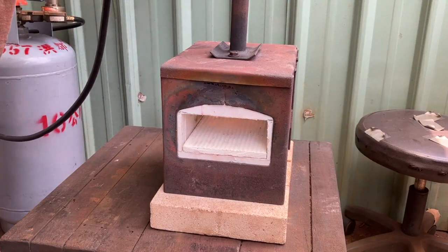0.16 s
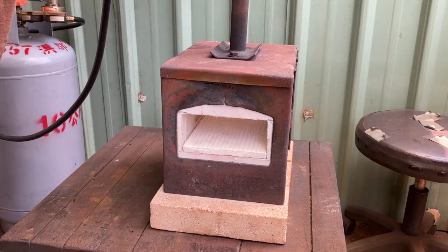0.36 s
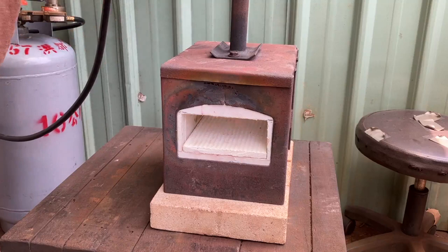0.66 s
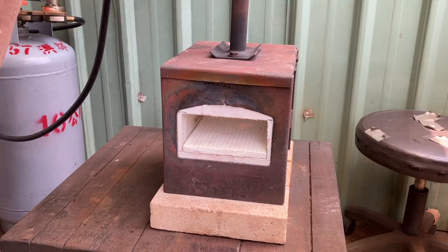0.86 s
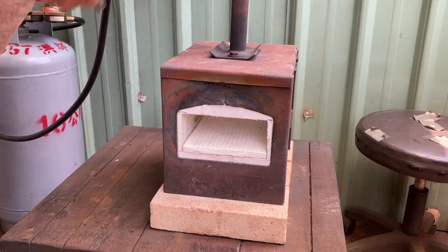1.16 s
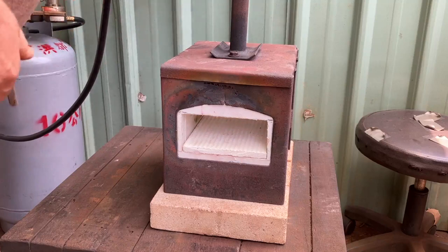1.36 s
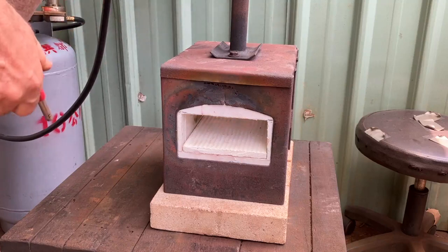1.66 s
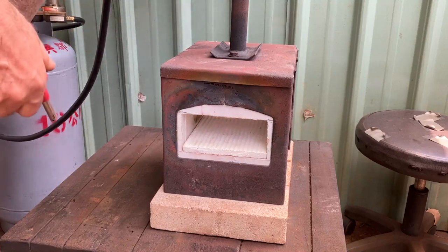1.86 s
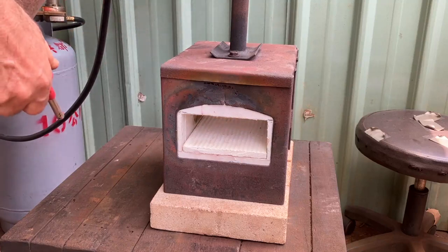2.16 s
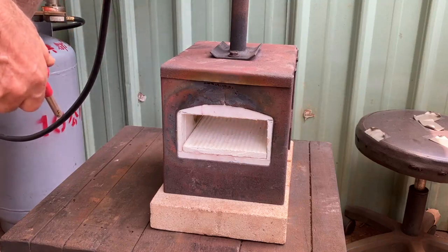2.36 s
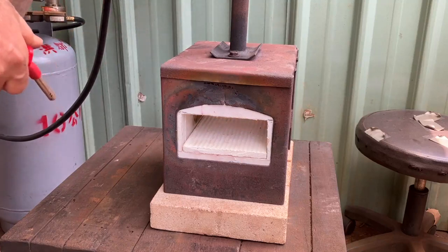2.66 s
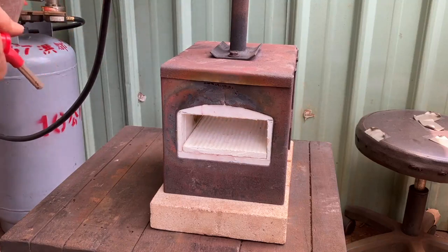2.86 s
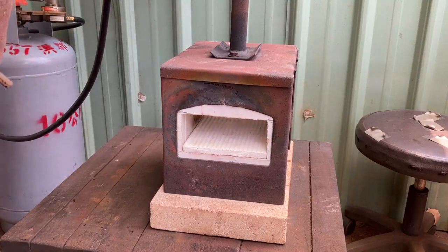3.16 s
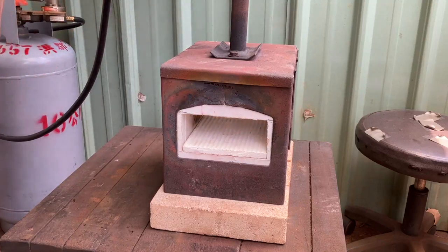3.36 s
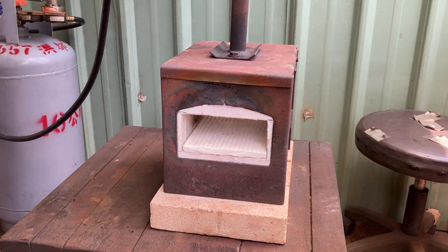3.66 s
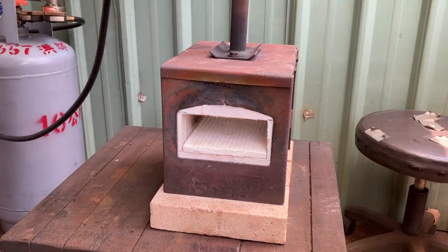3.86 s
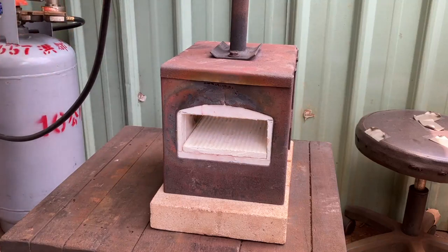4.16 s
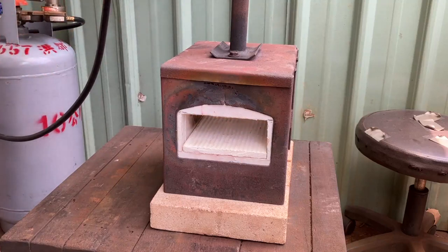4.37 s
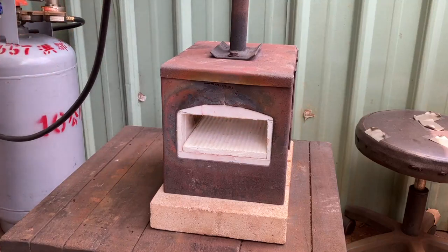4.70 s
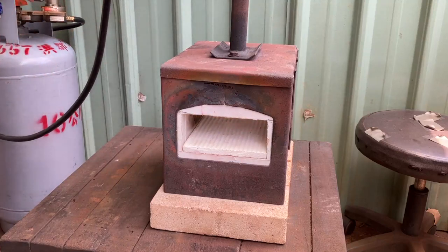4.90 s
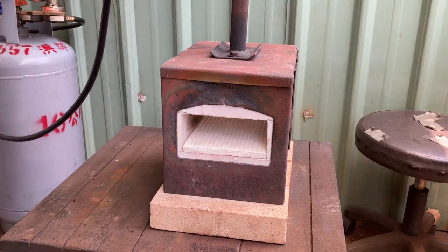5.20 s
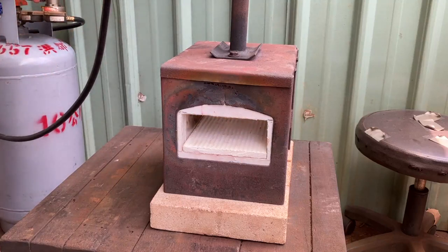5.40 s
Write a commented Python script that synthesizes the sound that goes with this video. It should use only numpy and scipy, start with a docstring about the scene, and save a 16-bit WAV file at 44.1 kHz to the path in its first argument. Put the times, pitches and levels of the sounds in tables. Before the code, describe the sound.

A hard ignition pop with a low whump, then a rapid, stuttering series of hollow hoots, about forty a second, over heavy bass rumble and rough hiss. Near 1.7 seconds the hooting stops and a smooth breathy roar with a wavering boom runs to the end. Nearby stereo pickup, thin in the deepest bass, with a brief sheet-metal shed echo.

```python
"""A thump as a gas forge burner catches, heard from two microphone ports a little apart in a sheet-metal shed.
The flame flutters in the burner pipe first: gliding tones hoot in quick puffs over a heavy noise rumble.
Then it jumps into the firebox: noise shaped by the box modes and a wavering boom make a steady roar.
Hissing noise of flame and jet lies behind; wall resonances and sparse reflections place it all in the shed."""
import sys
import numpy as np
from scipy import signal
from scipy.fft import rfft, irfft
from scipy.io import wavfile
from scipy.ndimage import uniform_filter1d

SR = 44100
rng = np.random.default_rng(int(sys.argv[2]) if len(sys.argv) > 2 else 0)


def waveform_to_disk(signal):
    """Save audio, clipped to [-1, 1], as 16-bit WAV at the path in sys.argv[1]."""
    frames = np.transpose(np.atleast_2d(signal))
    scaled = np.clip(frames, -1, 1) * 32767
    samples = np.round(scaled).astype(np.int16)
    wavfile.write(sys.argv[1], SR, samples)


N = 244314
T = np.arange(N) / SR
HZ = np.fft.rfftfreq(N, 1 / SR)
CATCH_S = 0.0373  # the gas catches
SETTLED = np.clip((T - 1.68) / 0.027, 0, 1)  # 0 while the flame is in the pipe, 1 in the firebox

# modes of the firebox: (frequency [Hz], width [Hz], height above the slope [dB])
FIREBOX = [(191.4, 32, 8.5), (309, 53, 5.5), (396, 29, 0.5), (1010, 24, 3), (1122, 80, 10.5)]
# slope of the roar: (frequency [Hz], relative density [dB per Hz])
ROAR = [(90, -6.5), (125, -7.5), (200, -1), (400, -5), (500, -18), (700, -14), (1000, -26.5), (1500, -30),
        (2500, -52), (5000, -49)]
# colour of the flame hiss: (frequency [Hz], relative density [dB per Hz])
HISS = [(600, 9), (1500, -1), (2500, 2.5), (3000, 1.5), (3700, -4), (4500, -3.5), (5200, -6.5), (6200, -17),
        (8000, -6), (12000, -91)]
# colour of the gas jet: (frequency [Hz], relative density [dB per Hz])
JET = [(3000, -39), (5500, -0.5), (7200, 1), (9000, -13.5), (11000, 4), (13500, -13), (16000, 1.5)]


def gain_of(db):
    """Decibels to gain."""
    return 10 ** (np.asarray(db) / 20)


def evened(x):
    """Scales to rms 1."""
    return x / np.sqrt(np.mean(x ** 2) + 1e-20)


def read(points, hz):
    """Reads a table on a log-frequency axis."""
    f, value = np.transpose(points)
    return np.interp(np.log(hz + 1), np.log(f + 1), value)


def columns(rows):
    """Turns the columns of a timed table into control curves, sample by sample."""
    s, *cols = np.transpose(rows)
    return [np.interp(T, s, c) for c in cols]


def bumps(modes):
    """Sum of bell-shaped peaks in dB; each has half its dB at the edges of its width."""
    return sum(db / (1 + (2 * (HZ - hz) / width) ** 2) for hz, width, db in modes)


def band(hz, width_hz):
    """Shape in dB of a steep resonance, 6 dB down at the edges of its width."""
    return -20 * np.log10(1 + (2 * (HZ - hz) / width_hz) ** 2)


def coloured(shape_db):
    """Two unrelated noises of one colour, at rms 1."""
    a, b = rng.standard_normal((2, 2, len(HZ)))
    return evened(irfft((a + 1j * b) * gain_of(shape_db), N))


def flicker(lo_hz, hi_hz, depth_db):
    """Random loudness of turbulent burning, power kept at 1."""
    spectrum = rfft(rng.standard_normal(N)) * (HZ > lo_hz)
    slow = evened(irfft(spectrum / np.sqrt((HZ + 1) * (1 + (HZ / hi_hz) ** 4)), N))
    return evened(gain_of(depth_db * slow))


def steadied(x, share):
    """Evens out the swells of a low noise, so that it throbs like an oscillation."""
    swell = np.sqrt(uniform_filter1d(x ** 2, round(0.054 * SR)))
    return evened(x / (swell + 0.063) ** share)


def patchy(x, depth_db):
    """Eddies colour a noise in patches that drift in time and pitch."""
    z = signal.stft(x, nperseg=1024)[2]
    patches = uniform_filter1d(rng.standard_normal(z.shape[1:]), size=5, axis=0)
    patches = uniform_filter1d(patches, size=12, axis=1)
    return evened(signal.istft(z * gain_of(depth_db * evened(patches)), nperseg=1024)[1][:, :N])


def resonate(x, hz, width_hz):
    """A resonance of gain 1 at its peak."""
    return signal.lfilter(*signal.iirpeak(hz, hz / width_hz, SR), x)


def add(mix, s, sound):
    """Mixes a sound in at a time."""
    part = mix[..., round(s * SR):][..., :sound.shape[-1]]
    part += sound[..., :part.shape[-1]]


def random_phases(count):
    """One random phase per event and row."""
    return rng.uniform(0, 2 * np.pi, (count, 2, 1))


def burst(db, hz, length, glide, phase, rise=0.28):
    """A short rounded tone that glides to its pitch and peaks at the share rise of its length."""
    length = max(length, .003)
    u = np.arange(round(length * SR)) / (length * SR)
    shape = np.sin(np.pi * u ** (np.log(.5) / np.log(rise))) ** 2
    pitch = hz * (1 - glide * np.exp(-u / 0.16))
    return gain_of(db) * shape * np.sin(2 * np.pi * np.cumsum(pitch) / SR + phase)


def firebox_roar(roar_db, shake):
    """Broad combustion noise through the firebox modes; once settled, a boom and a body join it."""
    # uneven random swells of the steady roar, the boom's pitch wavering slightly:
    # (time [s], boom level [dB], body level [dB], boom pitch [Hz])
    roar_swells = [(1.68, -47, -44, 194.7), (1.72, -27.5, -41, 194), (1.81, -24, -26, 181.5),
                   (1.87, -34, -38, 180), (1.93, -29, -25.5, 183.6), (1.99, -43, -37, 190),
                   (2.01, -36, -53, 194.5), (2.04, -42, -25, 200.7), (2.12, -22, -30, 185.9),
                   (2.14, -42, -38, 187.7), (2.17, -17.5, -32.5, 186.7), (2.27, -37, -25.5, 187.3),
                   (2.31, -24, -31, 190.2), (2.33, -30.5, -31, 192.7), (2.51, -20.5, -31.5, 190.8),
                   (2.56, -47, -38, 179.5), (2.6, -24, -29, 179.1), (2.71, -46, -31.5, 184.6),
                   (2.73, -22.5, -31.5, 182.4), (2.85, -26, -29, 205.7), (2.93, -29.5, -31, 185),
                   (3.14, -31, -27.5, 194.5), (3.22, -29, -24, 182), (3.3, -19.5, -30.5, 184.6),
                   (3.33, -30, -46, 182), (3.37, -23, -26, 180.8), (3.43, -26, -26.5, 186.9),
                   (3.46, -22, -45, 190.3), (3.5, -28, -21, 190.3), (3.53, -31, -31.5, 203.8),
                   (3.7, -25, -30, 189.7), (3.72, -51, -63, 192.7), (3.74, -19, -31, 192.1),
                   (3.78, -31, -28.5, 184.3), (3.95, -29.5, -30.5, 199), (3.98, -29.5, -33, 182.5),
                   (4.14, -26.5, -55, 192.2), (4.16, -43, -28, 198.6), (4.26, -20.5, -42, 210.7),
                   (4.32, -43, -28.5, 200.1), (4.36, -29, -29, 188.5), (4.44, -22, -27, 182.5),
                   (4.51, -30, -27.5, 205.1), (4.61, -28.5, -47, 196.5), (4.64, -40, -30, 196.2),
                   (4.68, -21.5, -30.5, 195.3), (4.78, -32, -28, 196.7), (4.81, -25, -55, 197.6),
                   (4.83, -28.5, -27.5, 191.5), (5.02, -26, -40, 185.3), (5.16, -24, -34, 188.6),
                   (5.18, -36, -46, 192.4), (5.24, -31, -28, 202.8), (5.29, -19.5, -29, 199.7),
                   (5.33, -29, -31.5, 184.2), (5.54, -25.5, -35, 178.7)]
    # colour of the body: (frequency [Hz], relative density [dB per Hz])
    body_colour = [(180, -19), (240, 3), (300, 12.5), (340, 7.5), (400, 7.5), (440, -38), (560, -53)]
    early = coloured(read(ROAR, HZ) + bumps(FIREBOX))
    around = FIREBOX[3:] + [(287, 110, -0.9)]  # what lies around the boom and body
    late = gain_of(-6) * coloured(read(ROAR, HZ) + bumps(around))
    roar = gain_of(roar_db) * ((1 - SETTLED) * early + SETTLED * late)
    boom_db, body_db, boom_hz = columns(roar_swells)
    roar += SETTLED * gain_of(boom_db) * boom(boom_hz, share=0.5)
    roar += SETTLED * gain_of(body_db) * steadied(coloured(read(body_colour, HZ)), share=0.55)
    roar += firebox_tones()
    return roar * shake * flicker(lo_hz=9.3, hi_hz=88, depth_db=0.5)


def boom(hz, share):
    """The lowest firebox tone: a narrow noise band around a slightly wavering pitch."""
    width_hz = 40
    z = coloured(band(0, width_hz)) + 1j * coloured(band(0, width_hz))
    z = z / (abs(z[:1]) + 0.9) ** share  # its swells are partly evened out
    return evened((z * np.exp(2j * np.pi * np.cumsum(hz) / SR)).real)


def firebox_tones():
    """Three narrow noise bands that trade strength as the flame changes length."""
    # strength of the tones: (time [s], low level [dB], middle level [dB], high level [dB])
    tone_levels = [(0.0, -54, -66, -69), (0.04, -29, -51, -29), (0.17, -45, -44, -38.5),
                   (0.57, -41.5, -38, -37), (1.02, -31, -45, -35.5), (1.29, -36.5, -46, -33),
                   (1.4, -34.5, -30.5, -33), (1.57, -33.5, -55, -38.5), (1.64, -36, -47, -34),
                   (1.68, -44, -61, -48), (1.73, -28, -54, -38.5), (1.95, -31.5, -45, -38.5),
                   (2.5, -31.5, -56, -38.5), (2.95, -33, -50, -38.5), (3.39, -31, -41, -41.5),
                   (3.75, -32, -40, -37), (4.12, -43.5, -39.5, -40), (4.7, -42, -40.5, -37.5),
                   (5.38, -70, -36, -40), (5.54, -54, -31.5, -32.5)]
    # place of the tones, low to high: (frequency [Hz], width [Hz])
    tone_modes = [(470, 134), (615, 104), (800, 110)]
    tones = np.zeros((2, N))
    for db, (hz, width) in zip(columns(tone_levels), tone_modes):
        tones += (T > CATCH_S) * gain_of(db) * coloured(band(hz, width))
    return tones


def hoot(db, hz, length, glide, phase):
    """One puff: a rounded tone whose pitch slides and levels off, with a faint third harmonic."""
    tail = 1.69  # a puff takes this much longer to fall than to rise
    t = np.arange(-length / 2, tail * length / 2, 1 / SR)
    pitch = hz + 500 * glide * length * np.tanh(2 * t / length)
    angle = 2 * np.pi * np.cumsum(pitch) / SR + phase
    shape = abs(np.cos(np.pi * t / length / np.where(t > 0, tail, 1))) ** 1.12
    return gain_of(db) * shape * (np.sin(angle) + gain_of(-37.5) * np.sin(3 * angle))


def puffs():
    """The hoots of the puffs, and the strength curves by which they drive howl, hiss and roar."""
    # each puff of flame in the pipe: (time of its top [s], peak level [dB], pitch at its top [Hz],
    # twice its rise time [s], slide at its top [Hz per ms], spit of hiss [dB], thud [dB])
    puff_rows = [(0.081, -23.5, 990, 0.016, 17, -46.5, -20), (0.109, -31, 936, 0.0132, 16, -52, -23),
                 (0.134, -16.5, 1008, 0.016, 14, -43, -39), (0.161, -19.5, 1053, 0.0203, 4.5, -68, -42),
                 (0.1907, -20.5, 1106, 0.014, 11, -42, -24.5), (0.222, -26.5, 990, 0.019, 10, -53, -32),
                 (0.243, -23, 1010, 0.011, 0, -52, -25), (0.268, -20.5, 920, 0.013, 6, -74, -36),
                 (0.293, -22.5, 895, 0.0095, 22, -61, -31), (0.328, -23, 1117, 0.022, 7, -39.5, -29),
                 (0.347, -29, 920, 0.0097, -4, -58, -37), (0.376, -17, 1037, 0.0108, 16, -48, -23),
                 (0.404, -20, 1036, 0.016, 14, -47, -21.5), (0.4235, -24, 886, 0.012, 6, -58, -27),
                 (0.448, -22, 1048, 0.014, 12, -52, -24), (0.4737, -19, 1050, 0.016, 10, -38.5, -19.5),
                 (0.497, -19, 873, 0.0099, 18, -73, -40), (0.517, -18, 947, 0.012, 22.3, -71, -26),
                 (0.5416, -17.5, 1007, 0.0097, 31, -41, -26), (0.569, -23, 954, 0.0123, 34, -54, -27),
                 (0.5933, -28.5, 1117, 0.016, 6, -53, -26), (0.6194, -22, 970, 0.016, -4, -65, -36),
                 (0.6445, -24.5, 960, 0.01, -6, -38.5, -18.5), (0.692, -27, 1020, 0.0093, 31, -47, -22.5),
                 (0.709, -34.5, 966, 0.025, 12, -52, -28.5), (0.737, -38, 1130, 0.015, 24, -55, -22),
                 (0.758, -30, 940, 0.0098, -10, -66, -24), (0.7834, -33, 1060, 0.014, 3, -70, -32),
                 (0.803, -25.5, 914, 0.028, 3, -48, -26), (0.828, -27, 914, 0.01, 21, -50, -25.5),
                 (0.8577, -16.5, 1153, 0.012, 6, -39.5, -19.5), (0.884, -29, 980, 0.0103, 6, -56, -21.5),
                 (0.925, -16.5, 1005, 0.0107, 18, -62, -31), (0.948, -16, 940, 0.018, -5, -66, -42),
                 (0.97, -12.5, 1170, 0.011, 5.8, -40.5, -19), (0.999, -24, 995, 0.0094, -1, -62, -37),
                 (1.0264, -24.5, 1110, 0.023, 5, -46, -18.5), (1.051, -31, 1040, 0.0106, 17, -53, -29),
                 (1.103, -22, 1098, 0.023, 8.5, -43, -20.5), (1.128, -17.5, 1067, 0.022, 11, -45, -27),
                 (1.153, -20, 1068, 0.012, 18, -43, -23), (1.176, -21, 996, 0.0113, 20, -52, -22.5),
                 (1.208, -30, 1020, 0.0097, -13, -51, -22.5), (1.227, -28, 1063, 0.016, 6, -48, -20.5),
                 (1.2504, -22, 1060, 0.011, 9, -49, -41), (1.27, -21, 987, 0.0109, 27, -55, -24),
                 (1.295, -22.5, 966, 0.019, 4, -62, -30), (1.317, -18, 960, 0.0121, 6, -48, -21),
                 (1.34, -23, 854, 0.0105, -23, -58, -28), (1.364, -26, 1070, 0.012, 15, -63, -39),
                 (1.384, -17, 848, 0.0119, 18, -60, -38), (1.407, -17, 934, 0.0122, 52, -49, -21),
                 (1.424, -36, 1114, 0.0216, 1, -47, -23), (1.444, -25, 1142, 0.01, 6, -46, -37),
                 (1.4706, -26, 1070, 0.011, 1, -59, -18), (1.493, -35, 1090, 0.015, -8, -65, -24),
                 (1.5154, -25.5, 920, 0.0116, 40, -41, -26), (1.5273, -33, 1025, 0.013, -23, -71, -37),
                 (1.549, -30, 986, 0.022, 2, -47, -29), (1.592, -31.5, 1000, 0.012, 9, -43, -24),
                 (1.6265, -22.5, 862, 0.0138, 29, -52, -39), (1.649, -26.5, 966, 0.01, -4, -59, -27.5)]
    usual_db, throb_share = -19, 0.21  # share of a puff's extra strength in dB that passes to the throb
    lead_s = 0.0053  # throb, spit and thud start this long before the top of a puff
    spit_rise_s, spit_fall_s, linger_s, linger_db = 0.0065, 0.0086, 0.024, -5.5
    whump_s = 0.007  # rise of the thud that a puff gives the roar
    u = np.arange(round(.08 * SR)) / SR
    throb_shape = u / 0.0047 * np.exp(1 - u / 0.0052)
    afterglow = gain_of(linger_db) * np.exp(-u / linger_s)
    spit_shape = (1 - np.exp(-u / spit_rise_s)) * (np.exp(-u / spit_fall_s) + afterglow)
    whump_shape = u / whump_s * np.exp(1 - u / whump_s)
    hoots, throb, spit, whump = np.zeros((2, N)), np.zeros(N), np.zeros(N), np.zeros(N)
    for row, phase in zip(puff_rows, random_phases(len(puff_rows))):
        top, db, hz, length, glide, spit_db, thud_db = row
        add(hoots, top - length / 2, hoot(db, hz, length, glide, phase))
        s = top - lead_s
        add(throb, s, gain_of(throb_share * (db - usual_db)) * throb_shape)
        add(spit, s, gain_of(spit_db) * spit_shape)
        add(whump, s, gain_of(thud_db) * whump_shape)
    return hoots, throb, spit, whump


def pipe():
    """Puffs of flame hoot in the pipe, ring on in its modes, and throb the howl, hiss and roar."""
    # modes of the pipe: (frequency [Hz], width [Hz], gain before the ring's own level [dB])
    pipe_modes = [(818, 30, 2), (950, 25, 3), (1048, 25, 2), (1126, 35, 1), (1225, 40, 2)]
    ring_db, echo_db = -5.5, -15  # the puffs stir the shed less than the thump does
    wall_s, wall_db = .0135, -13.5  # the nearest wall throws each puff back
    hoots, throb, spit, whump = puffs()
    ring = sum(gain_of(db) * resonate(hoots, hz, width) for hz, width, db in pipe_modes)
    hoots = hoots + snaps_and_thumps()
    thrown_back = np.roll(hoots, round(wall_s * SR), axis=1)
    tones = hoots + gain_of(wall_db) * thrown_back + gain_of(ring_db) * ring
    tones += gain_of(echo_db) * shed_echo(hoots)
    spit_noise = gain_of(5.5) * coloured(read(HISS, HZ)) + gain_of(0.5) * coloured(read(JET, HZ))
    whumps = whump * coloured(read(ROAR, HZ) + bumps(FIREBOX))
    return tones + pipe_flame(throb) + spit * spit_noise + whumps + rasps()


def pipe_flame(throb):
    """Noise of the flame inside the pipe: howl and overtone swell with the puffs over a deep flutter."""
    # levels: (time [s], howl before the throb [dB], overtone before the throb and a 2.5 dB cut [dB],
    # deep flutter [dB])
    pipe_levels = [(0.03, -35, -32, -39), (0.058, -43, -37, -32), (0.12, -35, -44, -25),
                   (0.24, -27, -39, -28), (0.998, -22.5, -36, -26), (1.342, -24.5, -36, -35),
                   (1.47, -20, -41, -20), (1.606, -29, -38.5, -28), (1.676, -47, -54, -24),
                   (1.72, -41, -54, -34)]
    # colour of the howl: (frequency [Hz], relative density [dB per Hz])
    howl_colour = [(380, -8), (650, -2), (807, 3), (866, -41), (926, 8), (1120, 12), (1240, -9),
                   (1300, -36), (1500, -52), (1950, -60), (3300, -120)]
    # colour of the overtone: (frequency [Hz], relative density [dB per Hz])
    overtone_colour = [(880, -39), (1500, -37), (1670, 11), (1800, 13.5), (1920, 15.5), (2250, 11.5),
                       (2440, 10), (2920, 3), (3400, -23), (4420, -38), (7480, -120)]
    # colour of the flutter: (frequency [Hz], relative density [dB per Hz])
    flutter_colour = [(15, -35), (25, -12), (34, -21), (42, 19), (52, 2), (70, -10), (120, -74)]
    howl_db, overtone_db, flutter_db = columns(pipe_levels)
    howl = gain_of(howl_db) * coloured(read(howl_colour, HZ)) * (0.16 + 0.48 * throb)
    overtone = gain_of(overtone_db - 2.5) * coloured(read(overtone_colour, HZ)) * (0.41 + 0.36 * throb)
    flutter = gain_of(flutter_db) * steadied(coloured(read(flutter_colour, HZ)), share=0.48)
    fade_in = np.clip((T - pipe_levels[0][0]) / 0.0076, 0, 1)
    fade_out = np.clip((pipe_levels[-1][0] - T) / 0.026, 0, 1)
    return fade_in * fade_out * (howl + overtone + flutter)


def snaps_and_thumps():
    """Short high tones snap on top of hard puffs; low ones thump as the flame falters in the pipe."""
    # bright snaps: (time [s], peak level [dB], pitch [Hz], length [s], glide [share of pitch])
    snaps = [(0.966, -35.5, 3260, 0.018, 0.05), (0.98, -41, 2050, 0.009, 0.045),
             (1.097, -39, 3280, 0.008, 0.05), (1.152, -43, 4200, 0.012, 0.03),
             (1.22, -45, 3670, 0.016, 0.02), (1.401, -42, 3280, 0.018, 0.07),
             (1.394, -43, 2130, 0.0067, 0.05), (1.438, -46, 3720, 0.015, 0.037),
             (1.439, -51, 4450, 0.01, 0.03)]
    # deep thumps: (time [s], peak level [dB], pitch [Hz], length [s])
    thumps = [(0.887, -25, 52, 0.06), (1.129, -21, 62, 0.048), (1.21, -22, 58, 0.044),
              (1.272, -23, 62.5, 0.035), (1.412, -16.5, 66, 0.037), (1.454, -16.5, 62, 0.046),
              (1.497, -17.5, 65.5, 0.045), (1.548, -20, 55.4, 0.046), (1.611, -22, 60, 0.055)]
    out = np.zeros((2, N))
    for (s, *row), phase in zip(snaps, random_phases(len(snaps))):
        add(out, s, burst(*row, phase))
    for (s, *row), phase in zip(thumps, random_phases(len(thumps))):
        add(out, s, burst(*row, 0, phase, rise=0.39))
    return out


def rasps():
    """Crackles on the puffs, above the hoot: each is a puff of noise around its own pitch."""
    # crackles: (time [s], level before an 11 dB cut [dB], centre [Hz])
    crackles = [(0.1062, -29, 2050), (0.1277, -35, 2310), (0.1651, -30.5, 1780), (0.1875, -32, 2130),
                (0.219, -43, 1990), (0.2379, -32, 2640), (0.2878, -41, 1750), (0.3257, -27, 1800),
                (0.3706, -32, 2080), (0.4016, -35, 1820), (0.4489, -36, 2110), (0.4719, -32, 2000),
                (0.4938, -33, 1900), (0.5178, -34, 1990), (0.5387, -31, 1980), (0.5891, -30.5, 2480),
                (0.642, -24, 1920), (0.6874, -33, 1830), (0.7562, -30, 2140), (0.8026, -33, 1990),
                (0.8261, -27.5, 1900), (0.854, -28, 1900), (0.8815, -26, 2140), (0.9703, -30.5, 1920),
                (1.0196, -36, 2160), (1.0416, -31, 2020), (1.0965, -29, 1890), (1.1279, -36, 1840),
                (1.1494, -31, 1810), (1.2007, -27, 1950), (1.2247, -29, 1860), (1.2551, -32, 2000),
                (1.3479, -35, 2030), (1.4182, -34, 1990), (1.5115, -33, 1940), (1.5849, -38, 1790),
                (1.6687, -45, 1670)]
    rise_s, fall_s, width_hz, cut_db = 0.0019, 0.017, 530, -11
    out, u = np.zeros((2, N)), np.arange(round(.05 * SR)) / SR
    shape = (1 - np.exp(-u / rise_s)) * np.exp(-u / fall_s)
    for s, db, hz in crackles:
        noise = rng.standard_normal((2, len(u)))
        rough = resonate(resonate(noise, hz, width_hz), hz, width_hz)
        add(out, s, gain_of(db + cut_db) * shape / shape.max() * evened(rough))
    return out


def ignition():
    """A crack, a knock and a deep thump as the gas in the box catches, with their echo in the shed."""
    # tones of the catch: (time [s], peak level [dB], pitch [Hz], length [s], glide [share of pitch])
    catch_tones = [(0.0373, -13.5, 1170, 0.0057, -0.1), (0.0366, -23, 1980, 0.0064, 0.04),
                   (.035, -21.5, 770, 0.0055, 0.7), (0.0405, -6, 261, 0.0091, -0.05),
                   (0.046, -23, 315, 0.013, 0.1), (0.093, -13, 140, 0.014, 0.05),
                   (0.041, -6, 48, 0.046, -0.3), (0.093, -18, 57, 0.04, -0.2)]
    out = np.zeros((2, N))
    for s, *row in catch_tones:
        add(out, s, burst(*row, np.array([[np.pi], [1.0]])))
    # colour of the crack: (frequency [Hz], relative density [dB per Hz])
    crack_colour = [(500, -26), (1500, -1), (2500, 8), (2900, -9), (6000, -22), (16000, -22)]
    after = np.maximum(T - CATCH_S, 0)
    crack = gain_of(-30.0) * (after > 0) * np.exp(-after / 0.01) * coloured(read(crack_colour, HZ))
    return out + crack + gain_of(-5.5) * shed_echo(out + crack)


def flame():
    """Rumble, roar, flame hiss and jet hiss follow their levels; one turbulence shakes all but the rumble."""
    # levels: (time [s], rumble [dB], roar [dB], flame hiss [dB], jet hiss [dB])
    flame_levels = [(0, -27, -52, -39, -38), (.034, -44, -35, -39, -38.5), (.041, -25, -16, -31.5, -39),
                    (.06, -19, -32, -35.5, -41), (.12, -26.5, -24.5, -44.5, -74), (.3, -28, -46, -48, -72),
                    (.325, -27.5, -26, -44, -60), (.6, -27, -38, -41.5, -60), (.9, -25.5, -23.5, -42, -56),
                    (1.19, -27, -31.5, -41.5, -61), (1.37, -25, -33, -43.5, -70),
                    (1.43, -26, -28, -38, -56), (1.51, -19, -36, -48, -67), (1.57, -24, -29.5, -50, -68),
                    (1.63, -26, -29.5, -48, -69), (1.66, -36, -32, -56, -60), (1.69, -50, -32, -51, -55),
                    (1.73, -30, -21, -45.5, -60), (2.2, -32, -22, -46, -70),
                    (3.0, -35.5, -21.5, -46.5, -65), (3.4, -33.5, -22.5, -45.5, -65),
                    (4.3, -35.5, -21, -47, -67), (5.14, -35, -21.5, -48, -73), (5.54, -36, -19, -43.5, -59)]
    rumble_db, roar_db, hiss_db, jet_db = columns(flame_levels)
    shake = flicker(lo_hz=1.5, hi_hz=34, depth_db=0.5)
    burning = firebox_roar(roar_db, shake) + flame_rumble(rumble_db)
    return burning + flame_hiss(hiss_db, shake) + jet_hiss(jet_db, shake)


def flame_rumble(rumble_db):
    """Heavy low noise with partly evened swells and a slow flicker of its own."""
    # colour of the rumble: (frequency [Hz], relative density [dB per Hz])
    rumble_colour = [(15, -37), (22, 1), (30, 7), (40, -15), (54, -3.5), (93, 1), (124, -5), (160, -18.5),
                     (250, -53)]
    rumble = steadied(coloured(read(rumble_colour, HZ)), share=0.37)
    return gain_of(rumble_db) * rumble * flicker(lo_hz=3, hi_hz=10.0, depth_db=2.0)


def flame_hiss(hiss_db, shake):
    """Patchy turbulent hiss; once settled, two brighter noise bands join it, their levels wandering by chance."""
    # chance wander of the bright bands:
    # (time [s], lower level before its trim [dB], upper level before its trim [dB])
    bright_levels = [(1.72, -65, -64), (2.1, -57, -66), (2.6, -57, -64), (3.1, -58, -59), (3.6, -63, -63),
                     (4.1, -60, -57), (4.35, -64, -63), (4.6, -58, -53), (4.9, -64, -61), (5.15, -59, -56),
                     (5.4, -57, -58), (5.54, -55, -59)]
    # place of the bands, lower then upper: (frequency [Hz], width [Hz], trim [dB])
    bright_bands = [(2430, 1000, -7), (3680, 620, -4)]
    hiss = gain_of(hiss_db) * patchy(coloured(read(HISS, HZ)), depth_db=2.5)
    hiss *= shake ** 0.46 * flicker(lo_hz=11.0, hi_hz=30, depth_db=.7)
    for level_db, (hz, width, trim_db) in zip(columns(bright_levels), bright_bands):
        hiss += SETTLED * gain_of(level_db + trim_db) * coloured(band(hz, width))
    return hiss


def jet_hiss(jet_db, shake):
    """High noise of the gas jet, flickering with the turbulence."""
    jet = gain_of(jet_db) * coloured(read(JET, HZ))
    return jet * shake ** 0.41 * flicker(lo_hz=3.5, hi_hz=70, depth_db=2.5)


def shed_echo(x):
    """Short ring of the shed: sparse reflections of random sign that die away fast."""
    t60_s, length = .2, 8000
    signs = rng.choice([-1., 1.], (2, length)) * (rng.random((2, length)) < .05)
    taps = signs * gain_of(-60 * T[:length] / t60_s)
    taps[:, :250] = 0  # no reflection arrives earlier
    taps /= np.linalg.norm(taps, axis=1, keepdims=True)
    return signal.fftconvolve(x, taps, axes=1)[:, :N]


def at_ports(shared, scattered):
    """Spectra at two ports: likeness, balance and lead between them vary with frequency."""
    # likeness of the ports: (frequency [Hz], likeness [0-1])
    likeness = [(60, .99), (150, 1), (350, .97), (420, .75), (500, .7), (640, .6), (820, .95), (980, .6),
                (1130, .85), (1500, .9), (1850, .68), (2350, .68), (3500, .4), (4300, .6), (6200, .35),
                (7200, .88), (14000, .82)]
    # balance of the ports: (frequency [Hz], left minus right [dB])
    balance = [(60, 1), (110, -1.5), (200, 1), (380, 1), (700, 0), (1290, 3), (2380, 3), (4400, 0.5),
               (8120, -0.5), (15000, 0.5)]
    # lead of the left port: (frequency [Hz], phase [rad])
    left_lead = [(60, 0), (150, -0.05), (300, -0.3), (400, 0.6), (516, 0.6), (620, 0.3), (1200, 0.3),
                 (1550, 1.1), (1900, 1.0), (2500, 0.2), (4500, 0.84), (5700, 5.5), (7200, -1.23)]
    lag_s = 0.00018  # above the last row the lead falls as a plain delay
    alike = np.clip(read(likeness, HZ), 0, 1)
    lead = read(left_lead, HZ) - 2 * np.pi * lag_s * np.maximum(HZ - left_lead[-1][0], 0)
    common, opposed = np.sqrt((1 + alike) / 2) * shared, np.sqrt((1 - alike) / 2) * scattered
    tilt = gain_of(read(balance, HZ) / 2) * np.exp(.5j * lead)
    return np.array([(common + opposed) * tilt, (common - opposed) / tilt])


def scene():
    """Row 0 of the sources reaches both ports; row 1 is the scattered part that differs between them."""
    # peaks and dips that the shed walls give every sound: (frequency [Hz], width [Hz], height [dB])
    shed_modes = [(60, 15, 3), (122, 14, -8), (440, 30, -5), (690, 40, -7), (1335, 25, -4), (1392, 40, 6),
                  (1450, 30, -3), (1590, 50, 6), (1765, 35, 4), (1860, 30, 6), (1915, 25, 3),
                  (1985, 30, 5.5), (2110, 35, 3.5), (2160, 40, -5), (2250, 55, 4), (2360, 40, 4.5),
                  (2460, 45, 4), (2580, 40, -4), (2730, 60, 2.5), (2840, 70, 3), (2980, 110, -6),
                  (3290, 50, 2.5), (3540, 90, 4.5), (3720, 50, 3), (3870, 90, 5.5), (4000, 50, 3),
                  (4100, 80, -2), (4760, 110, 4), (5130, 30, 4)]
    shared, scattered = rfft(flame() + pipe() + ignition()) * gain_of(bumps(shed_modes))
    return irfft(at_ports(shared, scattered), N)


def record(dry):
    """Bass roll-off of the microphone, then the band limit of the recorder."""
    bass_cut_hz, edge_hz = 42.2, 15800
    thin = signal.sosfilt(signal.butter(4, bass_cut_hz, "high", fs=SR, output="sos"), dry)
    band_limit = signal.firwin(511, edge_hz, window=("kaiser", 9), fs=SR)
    return signal.oaconvolve(thin, band_limit[None], "same")


dry = scene()
out = record(dry)
waveform_to_disk(out)
```